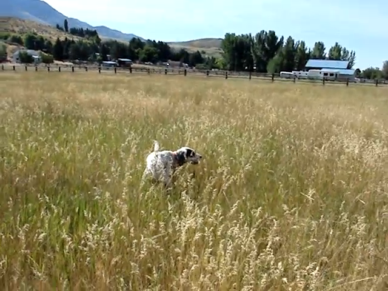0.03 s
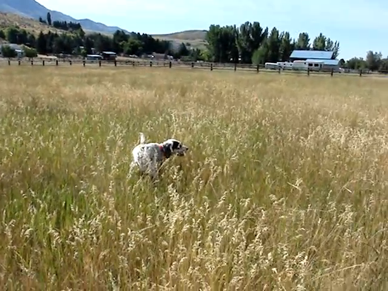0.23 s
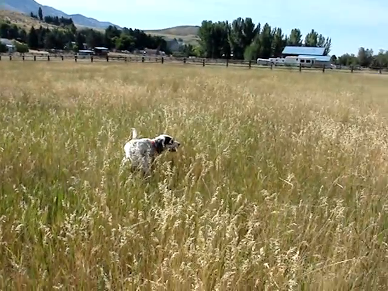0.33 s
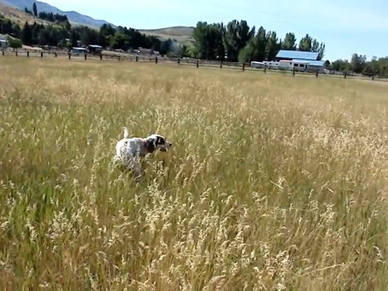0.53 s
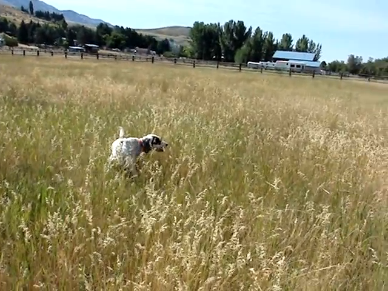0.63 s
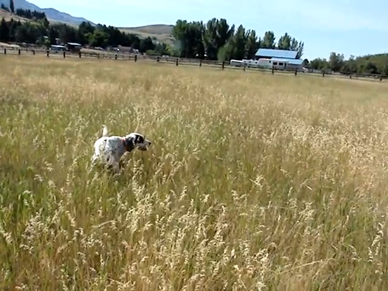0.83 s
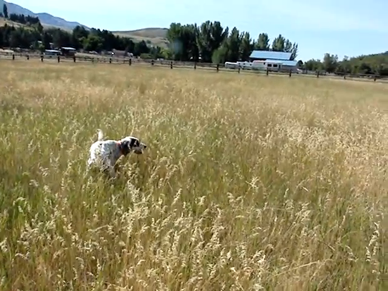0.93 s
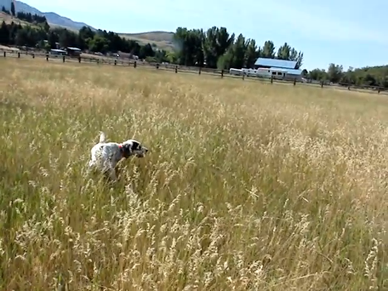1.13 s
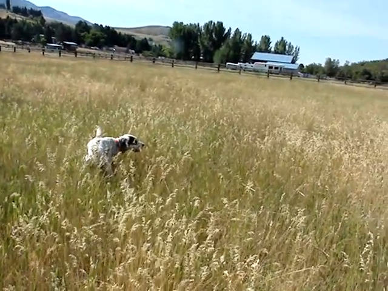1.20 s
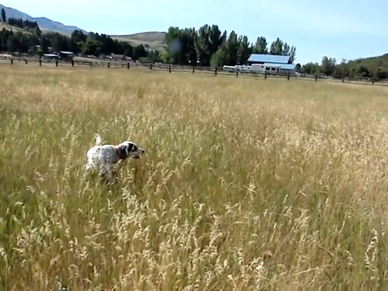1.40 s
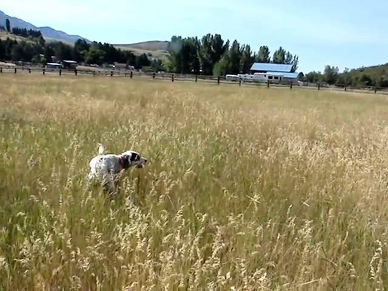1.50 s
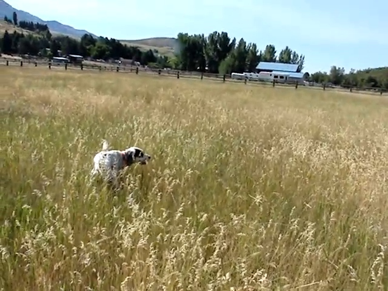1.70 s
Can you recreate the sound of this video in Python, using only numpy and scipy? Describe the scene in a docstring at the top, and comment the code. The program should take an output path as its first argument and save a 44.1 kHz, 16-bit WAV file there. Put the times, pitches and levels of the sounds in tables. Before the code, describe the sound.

Tall dry grass swishes and crackles close by in about five uneven strides, growing somewhat louder from 1 second. Stalks knock softly near the microphone throughout. One snaps hard against it at about 0.4 seconds, and a weaker, duller snap follows at 1.3. Underneath are the steady hiss of an open field, a few soft low wind puffs and very faint distant bird chirps in the first 0.6 seconds.

```python
"""Wading through tall dry grass

An open field in a light wind, heard from the microphone of a hand-held camera. Close by, blades swish
and crackle with each stride; stalks knock softly near the microphone and twice snap hard against it.
Under this lie the even hiss of the field, a few low puffs of wind and distant birds."""
import sys
import numpy as np
from scipy import signal
from scipy.fft import rfft, irfft
from scipy.io import wavfile
from scipy.ndimage import uniform_filter1d

SR = 44100
rng = np.random.default_rng(int(sys.argv[2]) if len(sys.argv) > 2 else 0)


def persist_wave(psi):
    """Save psi, clipped to +-1, as 16-bit WAV."""
    counts = np.round(np.clip(psi, -1, 1) * 32767).astype(np.int16)
    wavfile.write(sys.argv[1], SR, np.atleast_2d(counts).T)


N = 77175
T = np.arange(N) / SR

# blades brushing past, one list per stride: t/s, body level/dB, swish level/dB, treble level/dB
STRIDE_LEVELS = [
    [(0.0, -60.5, -58, -62), (0.04, -54.5, -54, -60), (0.08, -66.5, -64.5, -65), (0.19, -69, -64.5, -69)],
    [(0.19, -68, -63, -70), (0.235, -54.5, -46.5, -65), (0.253, -45.5, -48, -63), (0.285, -56, -48, -53),
     (0.31, -64, -55.5, -66.5), (0.40, -61, -63, -71), (0.46, -55, -56, -61), (0.52, -63.5, -65.5, -67),
     (0.60, -67, -61.5, -73)],
    [(0.60, -68, -66, -69), (0.64, -51.5, -52, -48.5), (0.665, -64, -53.5, -59), (0.695, -50, -46, -50),
     (0.728, -57.5, -54.5, -72), (0.748, -49.5, -49.5, -51.5), (0.762, -58, -54.5, -88),
     (0.776, -38, -41.5, -60), (0.79, -58.5, -54.5, -72), (0.83, -58, -58, -75)],
    [(0.83, -57, -59, -62), (0.90, -55.5, -50, -61), (0.96, -50, -47, -64), (0.995, -44.5, -44.5, -50.5),
     (1.035, -48, -49.5, -66), (1.08, -55.5, -53.5, -66), (1.092, -49.5, -46, -52),
     (1.134, -49, -51.5, -58.5), (1.144, -50, -43, -46), (1.175, -42.5, -51.5, -53),
     (1.198, -40.5, -51.5, -65), (1.222, -55.5, -56.5, -82.5), (1.30, -50.5, -55, -53.5)],
    [(1.30, -54, -85, -74), (1.342, -42.5, -47, -53), (1.365, -45, -47.5, -58), (1.39, -46, -40, -52.5),
     (1.42, -44, -48, -58), (1.445, -42.5, -41, -48.5), (1.47, -44, -54.5, -77), (1.51, -61.5, -59, -80),
     (1.56, -54, -65, -79)],
]
# spectra of the blades' dull body, swish and dry treble: f/Hz, level/dB
BODY_SPECTRUM = [(60, -25), (150, -12), (260, -7), (400, -2), (700, 0.5), (950, 0), (1300, -7.5),
                 (2000, -17), (4000, -43)]
SWISH_SPECTRUM = [(300, -25), (800, -25), (1400, -1.5), (2000, -2), (2700, 1.5), (3300, -1), (4000, -7),
                  (5000, -13), (6000, -10.5), (8000, -32.5)]
TREBLE_SPECTRUM = [(2500, -21), (3800, 10.5), (5000, -2), (6200, -2), (8000, 4), (10000, -9)]
# stalks near the microphone: t/s, level/dB, f/Hz, swell/s, click relative to the knock/dB
STALK_KNOCKS = [(0.0288, -33, 740, 0.0012, -2.5), (0.1144, -30, 520, 0.00081, -7),
                (0.2202, -28.5, 607.5, 0.0011, -20), (0.4037, -35.5, 770, .0005, -6),
                (0.6766, -36.5, 393, .0015, -10), (0.6941, -37, 1920, 0.0013, -15),
                (0.7121, -34.5, 640, 0.0012, -5), (0.7512, -36, 2320, 0.0008, -6),
                (0.7725, -37.5, 877, 0.0016, -6), (0.7786, -39, 670, .0009, 4.5),
                (1.0195, -34, 820, 0.00091, -7), (1.0315, -35.5, 345, 0.00096, 3),
                (1.0895, -36.5, 2290, .0006, -6), (1.1431, -33, 2720, 0.00044, 0.5),
                (1.1865, -39, 627, 0.0012, -13), (1.1912, -31, 571, 0.0016, -18),
                (1.1952, -27.5, 860, 0.00075, -22), (1.1993, -27.5, 738, .0017, -18),
                (1.3320, -24.5, 1120, 0.00058, -1), (1.3767, -31, 830, 0.00054, -7),
                (1.4375, -31, 820, 0.0012, -15), (1.4566, -38, 630, 0.0011, -7),
                (1.4778, -21.5, 840, 0.00082, -6.5), (1.48, -31, 440, 0.0015, -16),
                (1.5852, -41.5, 2200, 0.00041, -2)]
# stalks hitting the camera: t/s, thud/dB, ring lag/s, ring/dB, crack/dB, rattle/dB, air/dB, low-pass/Hz
STALK_SNAPS = [(0.4304, -13.5, 0.00079, -12.5, -25, -20, -32.5, 10400),
               (1.3246, -27.5, .0001, -5.5, -27, -30, -30.5, 4330)]
# modes of the camera's shell: f/Hz, level/dB, swell/s
SHELL_MODES = [(1350, -10, 0.00042), (1794, -2.5, 0.00032), (2640, -5, 0.00027)]
# rattle after a snap: f/Hz, level/dB
RATTLE_SPECTRUM = [(100, -30), (330, -0.5), (900, 0.5), (1800, 2), (2400, -2), (3300, -13.5), (4100, -7.5),
                   (4900, -16), (10000, -20.5)]
# hiss of the grass all around: f/Hz, level/dB
FIELD_SPECTRUM = [(18, -42.5), (30, -0.5), (65, -3.5), (189, -8), (412, -5), (622, -2.5), (773, -2.5),
                  (1090, -13), (1200, -6), (1600, -11.5), (2250, -11), (3400, -11), (3830, -14),
                  (5250, -14.5), (9870, -21), (12800, -70), (21700, -120)]
# wind on the microphone: t/s, level/dB, f/Hz, swell/s
WIND_PUFFS = [(0.165, -43.5, 60.3, 0.0052), (0.686, -53, 40, 0.0092), (0.844, -47, 51, 0.008),
              (0.931, -52, 37.8, 0.01), (1.15, -53, 41.6, .01), (1.597, -46, 63.5, 0.0073)]
# distant birds: t/s, length/s, first f/Hz, last f/Hz, level/dB
BIRD_CHIRPS = [(0.068, 0.042, 5300, 5130, -55), (0.139, 0.032, 3260, 3610, -53),
               (0.538, 0.048, 3240, 3670, -58)]


def amp(db):
    """Decibels to gain."""
    return 10 ** (np.asarray(db) / 20)


def unit(x):
    """Scales to rms 1."""
    return x / np.sqrt(np.mean(x ** 2) + 1e-20)


def colour(x, spectrum):
    """Shapes a sound by a spectrum read on a log-frequency axis, at rms 1."""
    hz, db = np.transpose(spectrum)
    bin_hz = np.fft.rfftfreq(len(x), 1 / SR)
    gain = amp(np.interp(np.log(bin_hz + 1), np.log(hz + 1), db))
    return unit(irfft(rfft(x) * gain, len(x)))


def add(mix, start_s, sound):
    """Mixes a sound in at its start time."""
    part = mix[max(round(start_s * SR), 0):][:len(sound)]
    part += sound[:len(part)]


def ring(hz, swell_s):
    """A heavily damped mode: its envelope swells to 1 and dies within a few cycles."""
    return T / swell_s * np.exp(1 - T / swell_s) * np.sin(2 * np.pi * hz * T)


def patchy(x, depth_db, bins, frames):
    """Lets patches of the spectrum swell and fade at random."""
    spectra = signal.stft(x, nperseg=256)[2]
    patches = uniform_filter1d(rng.standard_normal(spectra.shape), bins, axis=0)
    patches = uniform_filter1d(patches, frames, axis=1)
    return signal.istft(spectra * amp(depth_db * unit(patches)))[1][:N]


def crackle(per_s, spread_db, click_share):
    """Tiny clicks of uneven size over the smooth hiss of sliding blades."""
    sizes = amp(spread_db * np.minimum(rng.exponential(1, N), 4))
    clicks = sizes * rng.choice([-1, 1], N) * (rng.random(N) < per_s / SR)
    return np.sqrt(click_share) * unit(clicks) + np.sqrt(1 - click_share) * rng.standard_normal(N)


def strides():
    """Close by, blades brush past in swells: a dull body, a crackling swish and a dry fizz on top."""
    envelopes = np.zeros((3, N))
    for stride in STRIDE_LEVELS:
        times, *band_levels = np.transpose(stride)
        during = (T >= times[0]) & (T < times[-1])
        envelopes += during * amp([np.interp(T, times, db) for db in band_levels])
    body, swish, treble = envelopes
    grains = crackle(per_s=2300, spread_db=3.5, click_share=0.65)
    grains = patchy(grains, depth_db=2.5, bins=5, frames=7)
    fizz = crackle(per_s=2300, spread_db=7, click_share=0.41)
    return (body * colour(grains, BODY_SPECTRUM)
            + swish * colour(grains, SWISH_SPECTRUM)
            + treble * colour(fizz, TREBLE_SPECTRUM))


def knocks():
    """Near the microphone, each stalk gives a dull knock with a short click at its start."""
    out = np.zeros(N)
    click = ring(hz=1730, swell_s=0.00038)
    for start_s, db, hz, swell_s, click_db in STALK_KNOCKS:
        add(out, start_s, amp(db) * (ring(hz, swell_s) + amp(click_db) * click))
    return out


def snaps():
    """A stiff stalk whips the camera: thud, ring of the shell, crack, short rattle and a push of air."""
    crack_fade_s, rattle_fade_s, air_fade_s = 0.00073, 0.0053, 0.0074
    out = np.zeros(N)
    shell = sum(amp(db) * ring(hz, swell_s) for hz, db, swell_s in SHELL_MODES)
    for start_s, thud_db, lag_s, ring_db, crack_db, rattle_db, air_db, cutoff_hz in STALK_SNAPS:
        crack = colour(rng.standard_normal(N), TREBLE_SPECTRUM) * np.exp(-T / crack_fade_s)
        rattle = colour(rng.standard_normal(N), RATTLE_SPECTRUM) * np.exp(-T / rattle_fade_s)
        air = amp(air_db) * np.exp(-T / air_fade_s)
        thud = amp(thud_db) * ring(hz=532, swell_s=0.00082)
        snap = air - thud
        add(snap, lag_s, amp(crack_db) * crack + amp(rattle_db) * rattle - amp(ring_db) * shell)
        lowpass = signal.butter(3, cutoff_hz, fs=SR, output="sos")
        add(out, start_s, signal.sosfilt(lowpass, snap))
    return out


def field_hiss():
    """Steady hiss of wind in the grass all around."""
    rustle = crackle(per_s=1500, spread_db=4.5, click_share=0.27)
    rustle = patchy(rustle, depth_db=3.5, bins=5, frames=14)
    return amp(-53) * colour(rustle, FIELD_SPECTRUM)


def wind_puffs():
    """Small eddies push right on the microphone."""
    out = np.zeros(N)
    for start_s, db, hz, swell_s in WIND_PUFFS:
        add(out, start_s, amp(db) * ring(hz, swell_s))
    return out


def birds():
    """Faint gliding whistles from far across the field."""
    out = np.zeros(N)
    for start_s, length_s, first_hz, last_hz, db in BIRD_CHIRPS:
        progress = np.arange(0, length_s, 1 / SR) / length_s
        cycles = np.cumsum(first_hz + (last_hz - first_hz) * progress) / SR
        add(out, start_s, amp(db) * np.sin(np.pi * progress) * np.sin(2 * np.pi * cycles))
    return out


def scene():
    """All sources at one microphone in the open air, with no echo."""
    return (field_hiss() + strides() + knocks() + snaps() + wind_puffs() + birds())[None]


def record(dry):
    """The level dips briefly just before the first snap; the highest treble is cut off throughout."""
    dip_from_s, dip_to_s, dip_db = 0.4085, 0.4275, -38.0
    in_dip = (T > dip_from_s) & (T < dip_to_s)
    gain = amp(uniform_filter1d(dip_db * in_dip, size=130))  # 3 ms ramps
    lowpass = signal.firwin(601, cutoff=10130, window=("kaiser", 7), fs=SR)
    return signal.oaconvolve(dry * gain, lowpass[None], "same")


dry = scene()
out = record(dry)
persist_wave(out)
```